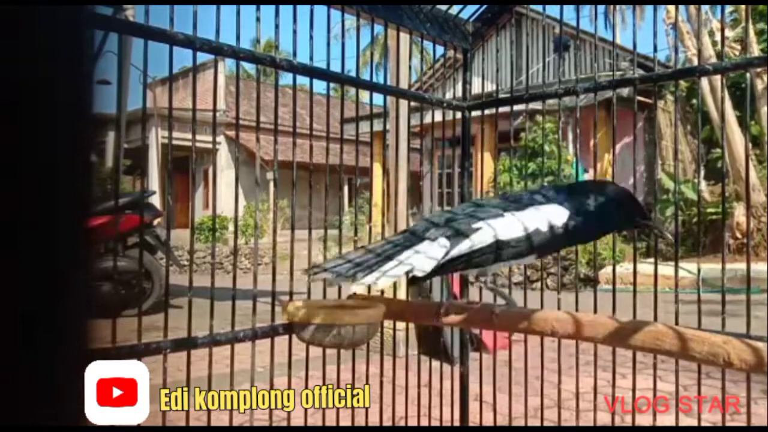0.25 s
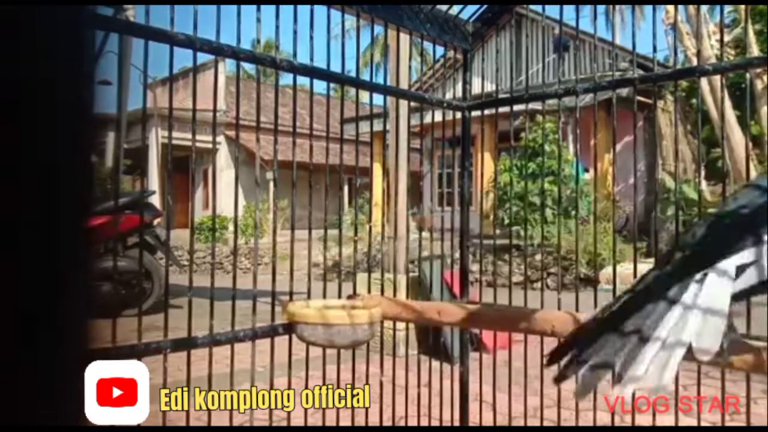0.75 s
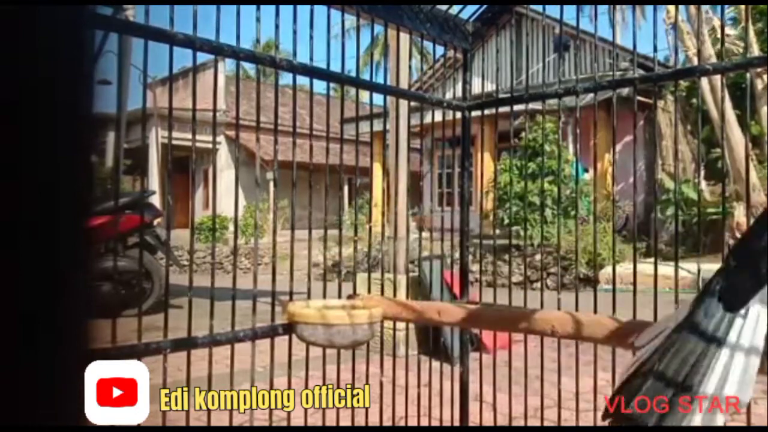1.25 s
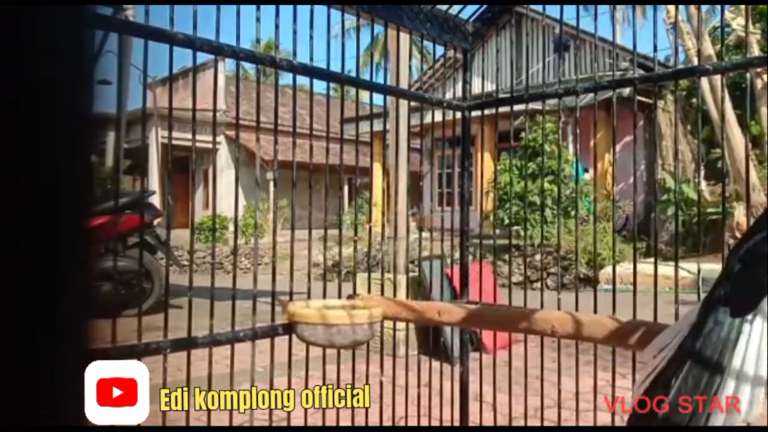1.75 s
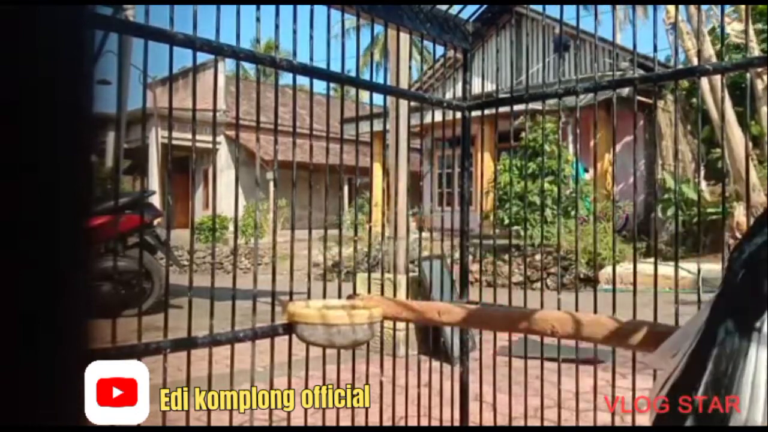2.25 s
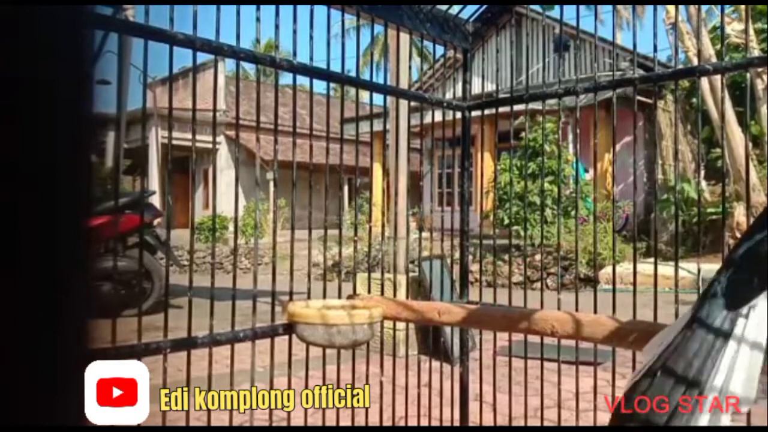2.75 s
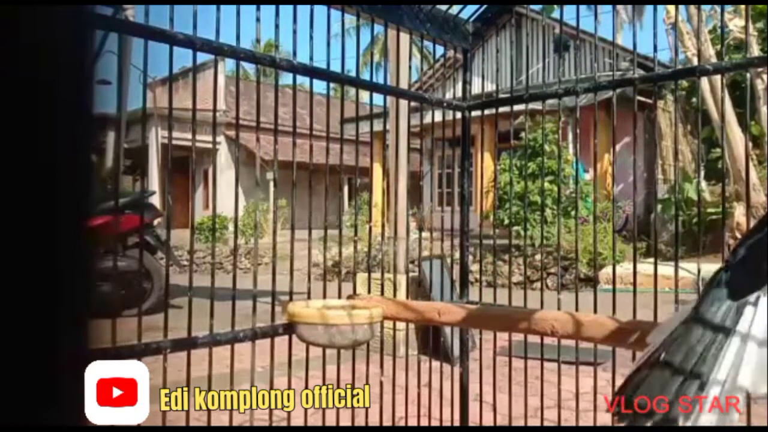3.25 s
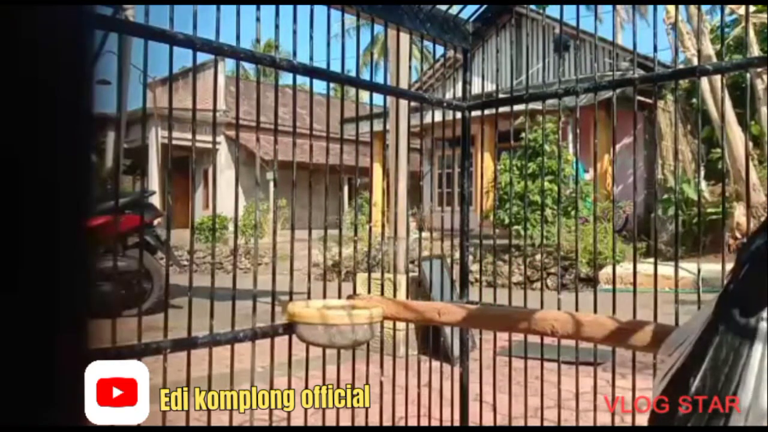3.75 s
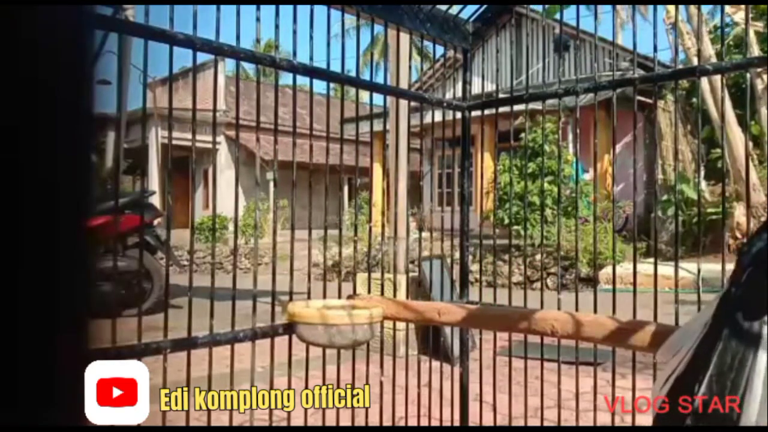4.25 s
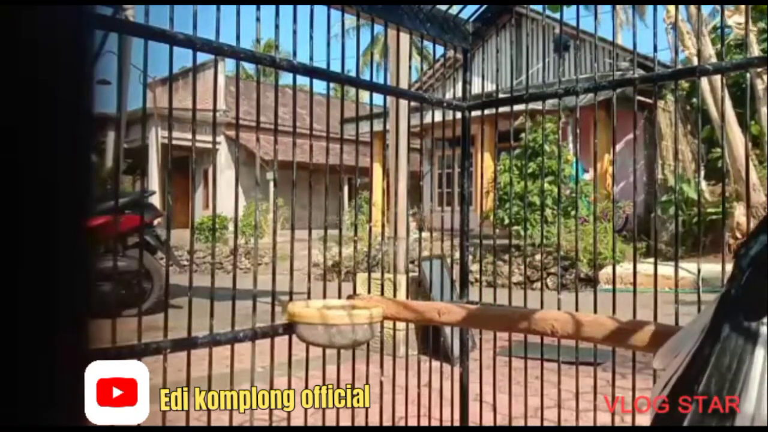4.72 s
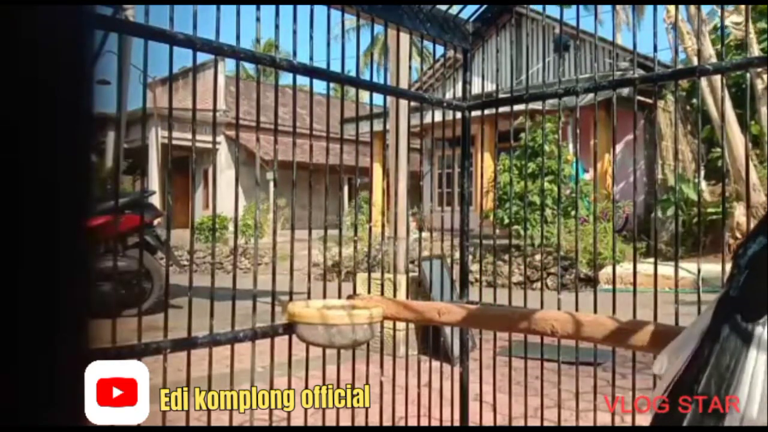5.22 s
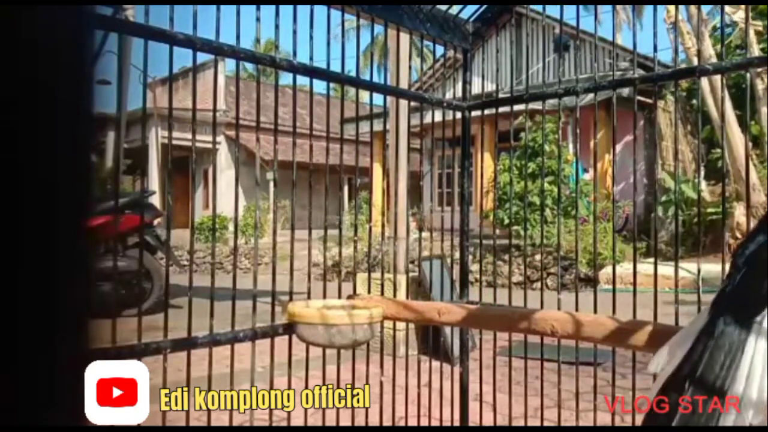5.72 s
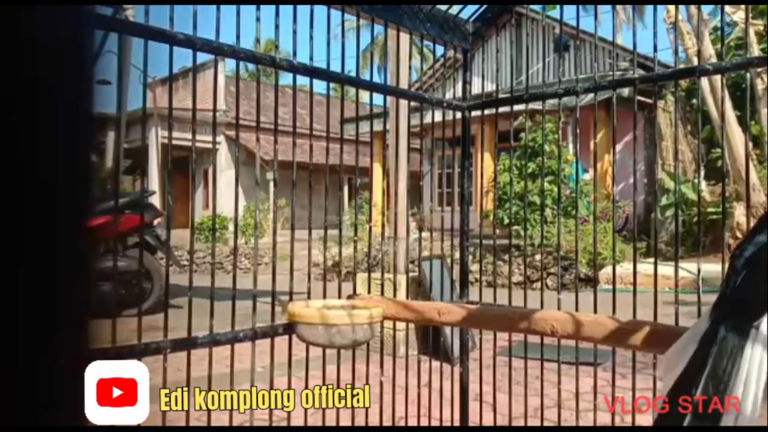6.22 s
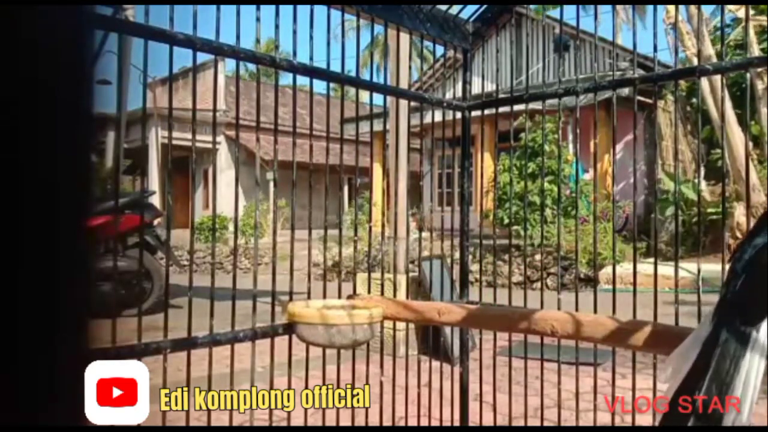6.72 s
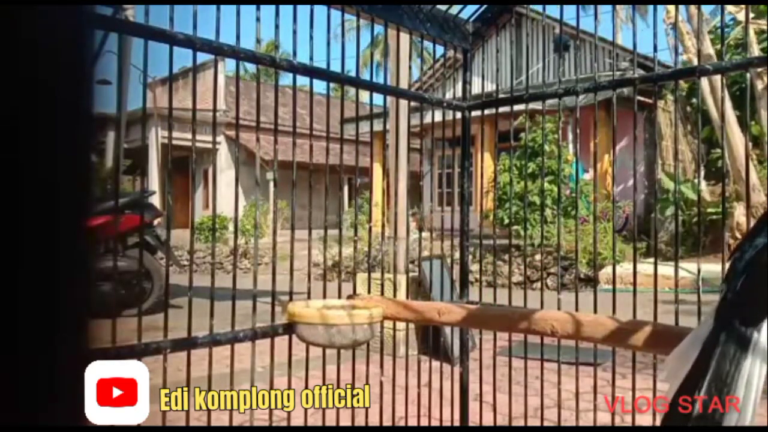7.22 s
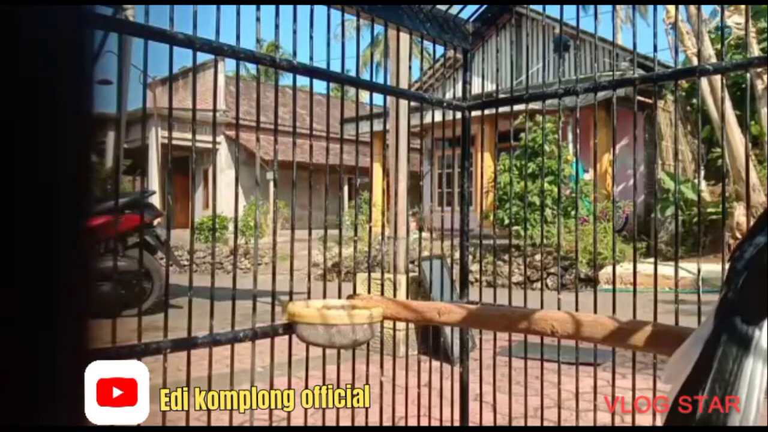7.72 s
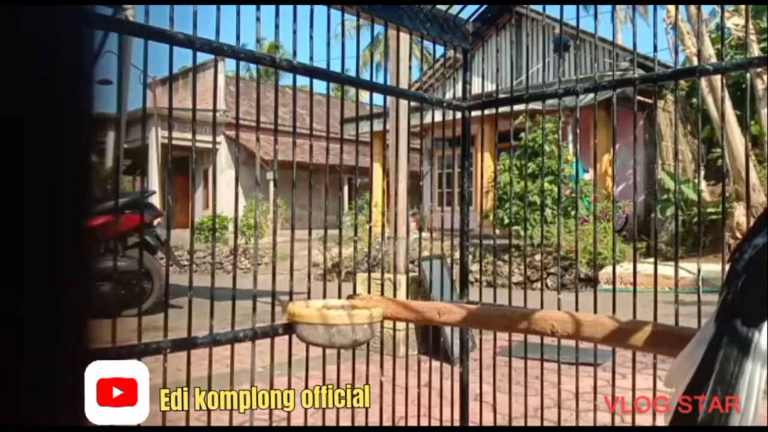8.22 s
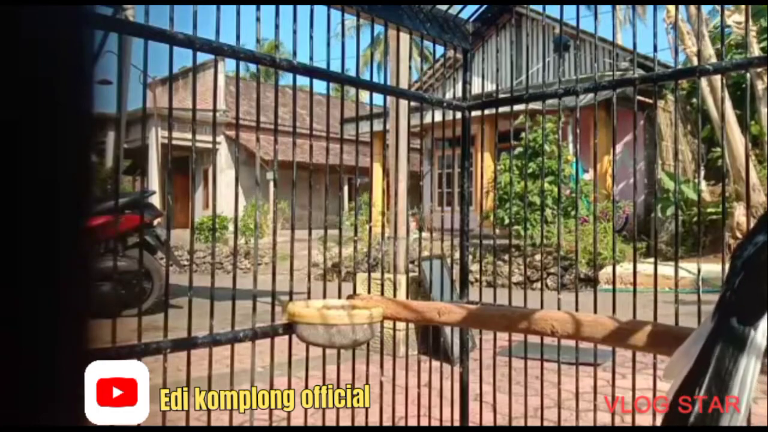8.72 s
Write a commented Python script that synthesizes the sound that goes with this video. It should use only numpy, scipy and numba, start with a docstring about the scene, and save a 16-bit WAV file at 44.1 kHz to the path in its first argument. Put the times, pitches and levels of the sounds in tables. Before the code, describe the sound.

Close, loud songbird whistles, chatters harshly and slides through falling notes in a yard, with one sharp cage click and faraway birds.

```python
"""A caged songbird sings close to a phone in a yard: whistles, rasping chatter, slides and swoops.
Its syrinx membranes make a gliding tone that the throat shapes; a second voice adds the rasp.
A claw strikes the cage, other birds answer from further off, walls echo, wind thumps on the
microphone port. The phone's gain control ducks the background under every loud note."""
import sys
import numpy as np
from scipy import signal
from scipy.fft import rfft, irfft, next_fast_len
from scipy.io import wavfile
from scipy.ndimage import uniform_filter1d
from numba import njit

SR = 44100
rng = np.random.default_rng(int(sys.argv[2]) if len(sys.argv) > 2 else 0)


def generate_wav(sig):
    """Save sig (samples, or channels by samples) to the path in sys.argv[1] as 16-bit PCM at SR."""
    pcm = np.round(np.clip(np.atleast_2d(sig).T, -1, 1) * 32767).astype(np.int16)
    wavfile.write(sys.argv[1], SR, pcm)


N = 395577
TIME = np.arange(N) / SR
BAND_LIMIT_HZ = 16800

# throat, beak and microphone together: (frequency [Hz], gain [dB])
THROAT_RESPONSE = [(600, -38.5), (1300, -10.5), (1900, -15), (2800, 2.5), (5500, 0), (6400, 0.5), (7300, 0),
                   (9500, -11.5), (12000, -16.5), (13500, -72), (15000, 5.5), (15700, -6.5), (16300, -54.5)]
# chatter: (start [s], length factor, pitch factor, level [dB], scoop depth [Hz])
CHATTER_NOTES = [(3.192, 1.034, 1.005, -5, 300.8), (3.3545, 0.91, 0.99, -4.5, 1002),
                 (3.5115, .99, 1.01, -2.5, 400), (3.679, 1, 0.99, -2, 27.73), (3.842, 1.023, 1, -5.5, 29.3),
                 (4.017, 0.984, 1.002, -4.5, 26.94), (4.2, 0.97, 1.011, -3, 30.3),
                 (4.3795, 1.054, 1.01, -2.3, 32.43), (4.567, 1.036, 1.017, -3.5, 30.2),
                 (4.771, 1.06, 1.005, -4.5, 29.34)]
# low harsh calls: (start [s], length factor, pitch factor, level [dB])
CHUCK_NOTES = [(0.148, 0.98, 0.928, -5), (2.614, 1, 1.034, -1), (2.926, 1, 1.1, 0.5)]
# steep falls that flatten out: (start [s], length factor, pitch factor, level [dB])
PLUNGE_NOTES = [(5.613, 0.95, .999, 0.055), (6.958, 1.01, 1.005, 0.11)]
# falling whistles: (start [s], length [s], first pitch [Hz], fall [Hz/s], floor [Hz], level [dB])
SLIDE_NOTES = [(5.156, 0.13, 6310, 24930, 3500, -0.5), (5.298, 0.094, 6242, 26100, 3800, -1),
               (5.457, 0.097, 5740, 18770, 3700, -1.5), (6.439, 0.15, 6060, 20050, 3620, -0.9),
               (6.599, 0.1026, 6116, 17800, 3700, -3.5), (6.775, 0.12, 5710, 17500, 3730, -1.5)]
# swoops that end climbing: (top time [s], top pitch [Hz], top level [dB], dive [s], bottom lift [dB],
# ending length factor, ending pitch factor, overtone lift [dB], flick level [dB])
CLIMBING_SWOOPS = [(7.2589, 5702, -7.5, 0.071, 4, 0.9, 1.0296, -5, -23),
                   (7.545, 4730, 3, 0.066, -1.5, 0.96, 1.02, -13.5, -7),
                   (7.855, 4410, -9, .056, -2, 1.033, .98, -14.5, -45),
                   (8.159, 4694, -11, 0.066, -5.5, 1.043, 0.98, -8, -13)]
# swoops that level off: same columns
LEVELLING_SWOOPS = [(8.487, 5025, 3.3, 0.066, 0.16, 1.001, 0.99, -9.5, -14.5),
                    (8.795, 5710, 15, 0.063, 5, 1.32, 0.924, -0.5, -6)]


def amp(db):
    """Gain of a level in dB."""
    return 10 ** (np.asarray(db) / 20)


def unit(x):
    """x at rms 1."""
    return x / np.sqrt(np.mean(x ** 2) + 1e-20)


def along(points, hz):
    """Interpolate (frequency [Hz], value) points on a log axis."""
    f, v = np.transpose(points)
    return np.interp(np.log(hz + 1), np.log(f + 1), v)


def wobble(rate_hz, size=N):
    """Piecewise linear random curve, rate_hz knots a second."""
    knots = rng.standard_normal(int(size * rate_hz / SR) + 2)
    return np.interp(np.arange(size) * rate_hz / SR, np.arange(len(knots)), knots)


def filtered(x, response):
    """Apply a gain given as a function of frequency."""
    m = next_fast_len(len(x) + 8192)
    return irfft(rfft(x, m) * response(np.fft.rfftfreq(m, 1 / SR)), m)[:len(x)]


def shaped(x, curve):
    """Filter by (frequency [Hz], gain [dB]) points."""
    return filtered(x, lambda f: amp(along(curve, f)))


def span(start_s, length_s, edge_s):
    """Gate with linear edges."""
    return np.clip(np.minimum(TIME - start_s, start_s + length_s - TIME) / edge_s, 0, 1)


def yard():
    """Faint, patchy hubbub of far birds and leaves, with one grainy rustle."""
    spectrum = [(300, -6), (700, -11.5), (1100, -15), (1260, 3), (1450, -21), (2300, -3), (4000, -7.5),
                (7200, -3.5), (8500, -20.5), (16000, -56.5)]  # hubbub: (frequency [Hz], relative density [dB])
    bins = signal.stft(rng.standard_normal(N + 512), nperseg=512)[2]
    patches = uniform_filter1d(uniform_filter1d(rng.standard_normal(bins.shape), 6, 0), 12, 1)
    hiss = signal.istft(bins * amp(5.2 * unit(patches)), nperseg=512)[1][:N]
    rustle_db = (9.1 + 5 * wobble(250)) * span(1.6887, 0.212, 0.062)
    return amp(-50.5 + rustle_db) * unit(shaped(hiss, spectrum))


def wind():
    """Eddies break on the port in short low lumps, brighter as the wind grows."""
    strength = [(0, -41), (.38, -32), (.9, -47), (1.85, -32), (2.25, -27), (2.6, -40), (2.9, -22),
                (3.3, -40.5), (4, -29.5), (4.6, -42.5), (5, -34), (5.4, -54.5), (5.9, -35), (6.5, -45),
                (7.2, -35.5), (7.55, -17.5), (8.02, -27.5), (8.97, -34.5)]  # buffeting: (time [s], level [dB])
    rumble_spectrum = [(20, -33.5), (45, -11), (80, 5.5), (130, -1), (220, -23), (400, -39.5), (700, -71),
                       (1500, -120)]  # its low body: (frequency [Hz], relative density [dB])
    flap_spectrum = [(90, -23.5), (160, 2.5), (300, -21), (500, -42), (1000, -110)]  # its upper edge: (frequency [Hz], relative density [dB])
    lumps = amp(4.73 * wobble(11) + 3.38 * wobble(25))
    rumble = unit(shaped(lumps * rng.standard_normal(N), rumble_spectrum))
    flap = unit(shaped(lumps * rng.standard_normal(N), flap_spectrum))
    gust_db = 17 * np.exp(-((TIME - 8.133) / 0.02) ** 2)
    level_db = np.interp(TIME, *np.transpose(strength)) + gust_db
    flap_db = -18 + 0.75 * (level_db - level_db.mean())
    return amp(level_db) * (rumble + amp(flap_db) * flap)


def walls(x, far_db=-14.5, far_t60_s=0.59, scatter=0.05):
    """Diffuse echo plus a weaker, longer far tail; moving leaves smear a share in pitch."""
    decay = [(1000, 0.3), (3500, 0.28), (8000, 0.18), (12000, 0.23)]  # wall echo: (frequency [Hz], t60 [s])
    hz, t, bins = signal.stft(rng.standard_normal(SR), SR, nperseg=256)
    envelope = amp(-60 * t / along(decay, hz)[:, None]) + amp(far_db - 60 * t / far_t60_s)
    tail = signal.istft(bins * envelope, SR, nperseg=256)[1]
    smeared = x * (np.sqrt(1 - scatter) + np.sqrt(scatter) * unit(wobble(900)))
    return signal.fftconvolve(np.pad(smeared, (300, 0)), tail / np.linalg.norm(tail))[:N]


def neighbours():
    """Distant birds: hoarse glides, the lower ones with a weak octave."""
    # calls: (start [s], length [s], first pitch [Hz], last pitch [Hz], level [dB], hoarseness [Hz])
    calls = [(0.078, 0.03, 3180, 2353, -39.5, 40), (0.108, 0.054, 2503, 2040, -31, 49.68),
             (0.708, 0.216, 3620, 3780, -45.5, 93), (0.978, 0.17, 3540, 6050, -47, 916.7),
             (1.68, 0.0207, 5500, 4800, -36, 129.6), (1.707, 0.042, 5320, 6260, -34, 111.1),
             (1.798, 0.043, 4170, 4780, -39.5, 129.6), (0.949, 0.072, 1940, 1875, -48.5, 62.7),
             (1.841, 0.025, 5150, 5760, -33.5, 216), (2.319, 0.041, 5680, 6340, -32.5, 248.4),
             (2.557, 0.085, 2544, 2582, -44, 275.6), (2.081, 0.15, 2370, 2330, -63.5, 29.6),
             (5.305, 0.025, 3120, 2720, -26.5, 98), (5.449, 0.083, 2310, 2450, -41, 185.2),
             (6.774, 0.055, 2130, 1786, -45.5, 99.5), (7.632, 0.19, 4920, 4550, -40, 138),
             (7.113, 0.14, 1907, 1653, -50, 162), (7.122, 0.096, 723, 794, -55.5, 37.04),
             (8.073, 0.027, 2340, 3228, -40, 30), (8.097, 0.033, 3260, 2300, -32, 32.04),
             (8.179, 0.051, 3800, 3640, -23.5, 48.06), (8.648, 0.1, 3580, 3341, -26.5, 55.6),
             (8.668, 0.098, 2325, 2258, -35.5, 24), (8.637, 0.11, 4740, 4440, -33.5, 57.5),
             (8.78, .19, 3183, 3045, -29.5, 37)]
    trill = [(.245, 2185, -41.5), (.352, 2160, -38.5), (0.436, 1926, -38.5), (.522, 2530, -41.5),
             (0.551, 1893, -40.5), (0.611, 2680, -40), (.64, 2170, -41), (0.699, 2530, -39.5),
             (.733, 1970, -44), (.808, 2250, -38.5)]  # row of dropping notes: (start [s], landing pitch [Hz], level [dB])
    notes = [(*row, 1) for row in calls] + [(s, 0.04, hz * 1.18, hz, db, 70, 3) for s, hz, db in trill]
    out = np.zeros(N)
    for start_s, length_s, first_hz, last_hz, db, hoarse_hz, bend in notes:
        n = round(length_s * SR)
        glide_hz = last_hz + (first_hz - last_hz) * np.linspace(1, 0, n) ** bend
        phase = 2 * np.pi * np.cumsum(glide_hz + hoarse_hz * wobble(600, n)) / SR
        swell = np.sin(np.pi * np.arange(n) / n) ** 0.28 * amp(db + 5 * wobble(112, n))
        octave = 0.052 * (first_hz < 4000) * np.sin(2 * phase)
        out[round(start_s * SR):][:n] += swell * (np.sin(phase) + octave)
    return out


def cage(crack_t60_s=0.0028, rattle_t60_s=0.3):
    """A claw strikes the cage: sharp cracks, each with a short rattle of the bars."""
    strikes = [(2.361, -6.5), (2.377, -24)]  # claw strikes: (time [s], level [dB])
    response = [(700, -14), (1500, -3), (7000, 2), (10000, -14), (15200, -22.5)]  # ([Hz], [dB])
    out, t = np.zeros(N), np.arange(SR // 4) / SR
    envelope = amp(-60 * t / crack_t60_s) + amp(-25 - 60 * t / rattle_t60_s)
    for start_s, db in strikes:
        out[round(start_s * SR):][:len(t)] += amp(db) * envelope * rng.standard_normal(len(t))
    return shaped(out, response)


def repeated(shape, repeats, lift_db, thinning_db_per_s=0):
    """Stretched, transposed copies of one note shape; the overtones may thin out along it."""
    t, hz, db = np.transpose(shape)
    return [np.transpose([s + t * longer, hz * higher, db + gain_db, lift_db - thinning_db_per_s * t])
            for s, longer, higher, gain_db, *_ in repeats]


def scooped(note, depth_hz, scoop_hz_per_s=200000, scoop_s=0.005, sag_s=0.009):
    """A note entered from below and left downward, with a random overtone lift."""
    rows = np.vstack([note[0] - [depth_hz / scoop_hz_per_s, 0, 0, 0], note])
    t = rows[:, 0]
    rows[:, 1] -= depth_hz * np.exp(-(t - t[0]) / scoop_s)
    rows[:, 1] -= min(depth_hz, 427.5) * np.exp((t - t[-1]) / sag_s)
    rows[:, 3] += rng.normal(0, 2.5)
    return rows


def whistles(lift_db, thinning_db_per_s):
    """Level whistles: scoop, hold, final upward flick."""
    # whistles: (start [s], hold end [s], pitch factor, level [dB], creep before flick [Hz], scoop share)
    repeats = [(.831, .934, .99, -4, 90, 1), (1.213, 1.343, .997, -2.5, 130, 1),
               (1.537, 1.658, 1.003, -2.5, 70, .8), (1.898, 2.043, .999, -2, 5, .45)]
    onset = [(0, 2893, -22.5), (.005, 3122, -9.5), (.011, 3376, 0), (.019, 3520, 1.5), (.03, 3517, 8)]  # scoop: (time after start [s], pitch [Hz], level [dB])
    flick = [(-.03, 3537, 8), (-.008, 3537, 9.5), (0, 3613, 2.5), (.004, 5000, -7.5), (.008, 5656, -7)]  # flick: (time after hold end [s], pitch [Hz], level [dB])
    notes, held_hz = [], onset[-1][1]
    for start_s, end_s, higher, gain_db, creep_hz, scoop in repeats:
        rows = [(start_s + t, held_hz + scoop * (hz - held_hz), db) for t, hz, db in onset]
        rows += [(end_s + t, hz + creep_hz * (-0.012 < t < 0.002), db) for t, hz, db in flick]
        notes.append(np.array([(t, hz * higher, db + gain_db, lift_db - thinning_db_per_s * (t - start_s))
                               for t, hz, db in rows]))
    return notes


def slides(lift_db, break_hz=4750, landing_hz=260, attack_s=0.005, release_s=0.011, tie_s=0.03):
    """Falls that slip at the voice break and ease out; close ones are tied by an upward flick."""
    break_levels = [(3500, 3.5), (3900, -1.5), (4500, 9.5), (4750, 1), (5300, 8.5), (6000, 2.5)]  # voice breaking on the way down: (pitch [Hz], level [dB])
    notes, end_s, u = [], -1, np.linspace(0, 1, 25)
    for start_s, length_s, first_hz, fall_hz_per_s, floor_hz, db in SLIDE_NOTES:
        straight_hz = first_hz - fall_hz_per_s * length_s * u
        slipped_hz = straight_hz - 324.7 / (1 + np.exp((straight_hz - break_hz) / 180))
        hz = floor_hz + landing_hz * np.logaddexp(0, (slipped_hz - floor_hz) / landing_hz)
        body = np.transpose([start_s + length_s * u, hz, db + along(break_levels, hz)])
        tail = [(start_s + length_s + release_s, 0.95 * hz[-1], -25)]
        if start_s - end_s < tie_s:
            notes[-1] = np.vstack([notes[-1][:-1], [(start_s - attack_s, 0.74 * first_hz, 1)], body, tail])
        else:
            notes.append(np.vstack([[(start_s - attack_s, 1.03 * first_hz, -30)], body, tail]))
        end_s = start_s + length_s
    return [np.c_[note, np.full(len(note), lift_db)] for note in notes]


def swoops(rows, ending, flick_hz=2710, flick_s=0.0092, rise_s=0.0034):
    """Upward flick, dive and ending joined into one note."""
    dive = [(0.071, 3498, 1.5), (0.159, 2678, -1), (0.442, 2300, -9.5), (.6, 1920, -17.5),
            (0.999, 1675, -25.5)]  # descent: (share of the dive, pitch [Hz], level [dB])
    notes = []
    for top_s, top_hz, top_db, dive_s, low_db, longer, higher, lift_db, flick_db in rows:
        near_top_hz = top_hz - (top_hz - flick_hz) * (rise_s / flick_s) ** 2
        note = [(top_s - flick_s, flick_hz, flick_db - 18), (top_s - rise_s, near_top_hz, flick_db),
                (top_s, top_hz, top_db)]
        note += [(top_s + u * dive_s, hz, db + low_db * u) for u, hz, db in dive]
        note += [(top_s + dive_s + t * longer, hz * higher, db + low_db * max(0, 1 - t / 0.043))
                 for t, hz, db in ending]
        notes.append(np.c_[note, np.full(len(note), lift_db)])
    return notes


def song_notes():
    """All notes in order, each as rows of (time [s], pitch [Hz], level [dB], overtone lift [dB])."""
    # note shapes: (time after start [s], pitch [Hz], level [dB])
    chatter_shape = [(0.003, 2428, -22.5), (0.0052, 2515, -5.5), (0.0131, 2504, 3), (0.0572, 2295, -7),
                     (0.0762, 2194, -5), (0.0781, 2092, -0.5), (0.1035, 1990, -10.5), (0.1095, 1897, -20),
                     (0.114, 1880, -27)]
    chuck_shape = [(.004, 2249, -24.5), (.022, 1986, -5.5), (.042, 1645, -5), (.066, 1969, -9.5),
                   (.072, 1900, -6.5), (.077, 1799, -31)]
    plunge_shape = [(0, 5855, -10), (.0075, 5480, -4.5), (.014, 3978, 5), (.02, 3128, -2.5),
                    (.039, 2380, -8.5), (.072, 1924, -2), (.123, 1720, -4), (.138, 1552, -15),
                    (.146, 1444, -25)]
    arch_shape = [(0, 1517, -29.5), (.012, 2234, -23.5), (.034, 3547, 8.5), (.046, 3295, -2),
                  (.06, 2700, -5), (.066, 2675, -20)]  # up and over
    hook_shape = [(.001, 4650, -31), (.004, 4570, 4.5), (.021, 2840, 1.5), (.032, 2640, -3.5),
                  (.044, 2630, -5), (.05, 2670, -46)]  # short fall
    blip_shape = [(.002, 1740, -12), (.012, 2342, -1), (.027, 1338, -24)]  # small arch after a hook
    # their repeats: (start [s], length factor, pitch factor, level [dB])
    arches = [(5.037, .98, .95, 0.12), (6.319, 1.001, 1.001, .1)]
    hooks = [(5.912, .99, .995, 0.84), (6.114, 1.03, 1.005, -1.9)]
    blips = [(5.966, 0.9, 1.001, -2.5), (6.169, 1.4, .86, -8.5)]
    # swoop endings: (time after the bottom [s], pitch [Hz], level [dB])
    climb = [(0.014, 1872, -23.5), (0.027, 2770, -7.5), (.045, 2978, -0.5), (.072, 3246, 0.5),
             (.098, 3920, 4.5), (0.108, 3965, 8.5), (.13, 3578, -11)]
    level_off = [(0.016, 1880, -17), (0.032, 2721, -10.5), (0.051, 2970, -0.5), (.1, 2722, 1),
                 (.133, 2670, -3), (.142, 2587, -11)]
    chatter = repeated(chatter_shape, CHATTER_NOTES, lift_db=-3.5, thinning_db_per_s=157.5)
    notes = [scooped(note, row[-1]) for note, row in zip(chatter, CHATTER_NOTES)]
    notes += whistles(lift_db=-4.5, thinning_db_per_s=41)
    notes += repeated(chuck_shape, CHUCK_NOTES, lift_db=-9.5, thinning_db_per_s=111)
    notes += repeated(arch_shape, arches, lift_db=-5.5)
    notes += repeated(plunge_shape, PLUNGE_NOTES, lift_db=10.5)
    notes += repeated(hook_shape, hooks, lift_db=2) + repeated(blip_shape, blips, lift_db=-10.5)
    notes += slides(lift_db=-14.5)
    notes += swoops(CLIMBING_SWOOPS, climb) + swoops(LEVELLING_SWOOPS, level_off)
    return sorted(notes, key=lambda note: note[0][0])


def rasping(phase, attack_s=0.012, release_s=0.011):
    """Both syrinx halves mix into sum and difference tones and noise; returns (rasp, share drowned)."""
    # second voice: (delay [s], length [s], pitch [Hz], fall share, level re note [dB], share drowned)
    chuck_rasp = (0.001, .042, 3300, .2, 2.7, .85)
    chatter_rasp = (.048, .053, 4100, .42, -0.5, .5)
    plunge_rasp = (.013, .035, 4900, .2, -10, .2)
    kinds = (CHUCK_NOTES, chuck_rasp), (CHATTER_NOTES, chatter_rasp), (PLUNGE_NOTES, plunge_rasp)
    events = [(row[0] + delay_s, *rest) for rows, (delay_s, *rest) in kinds for row in rows]

    def response(hz):
        return amp(along(THROAT_RESPONSE, hz)) / (1 + (hz / 9230) ** 2) / (1 + (1500 / (hz + 1)) ** 4)

    rasp, drowned = np.zeros(N), np.zeros(N)
    for start_s, length_s, top_hz, fall, rasp_db, share in events:
        cut = slice(round(start_s * SR), round((start_s + length_s) * SR))
        t = TIME[cut] - start_s
        warble = np.sin(2 * np.pi * rng.normal(86, 5.5) * t + rng.normal(-1.2, 0.66))
        contour = 1 - fall * t / length_s - 0.18 * np.exp(-t / 0.008)
        second_hz = top_hz * (contour + 0.068 * warble + 0.04 * wobble(450, len(t)))
        second_phase = 2 * np.pi * np.cumsum(second_hz) / SR
        pulses = np.exp(0.7 * np.cos(second_phase) + 0.6 * np.cos(phase[cut]))
        noise = 0.6 * unit(np.sqrt(pulses)) * rng.standard_normal(len(t))
        mixed = unit(pulses - pulses.mean()) + 0.25 * np.cos(second_phase + phase[cut]) + noise
        gate = np.clip(np.minimum(t / attack_s, (length_s - t) / release_s), 0, 1)
        level_db = rasp_db + 3.5 * warble - 12 * (t / length_s - 0.5) + rng.normal(0, 1.5)
        rasp[cut] = amp(level_db) * gate * unit(filtered(mixed, response))
        drowned[cut] = gate * share
    return rasp, drowned


def undertones(phase, length_s=0.0153):
    """The membranes briefly skip every other beat: tones at 1/2 and 3/2 of the pitch."""
    skips = [4.385, 4.574, 4.778, 7.563, 7.624, 7.866, 7.935, 8.245, 8.58]  # skipping: (start [s])
    gate = sum(span(start_s, length_s, 0.0031) for start_s in skips)
    return gate * (amp(-23.5) * np.sin(phase / 2) + amp(-25) * np.sin(3 / 2 * phase))


def unsteadiness(swoop_tops):
    """Relative pitch deviations: (fast quaver and scratch, slower waver)."""
    quavers = [(5.249, 0.037, 129.2, 0.022), (6.517, 0.087, 137.7, 0.045)]  # pitch shakes: (start [s], length [s], rate [Hz], depth share)
    hoarse = [(.004, .045, .022), (.112, .035, .045)]  # scratch in plunges and chucks: (delay [s], length [s], depth share)
    quaver = sum(depth * span(s, length_s, 0.0027) * np.sin(2 * np.pi * hz * TIME + 1.2 * wobble(57))
                 for s, length_s, hz, depth in quavers)
    scratch = wobble(900) * sum(depth * span(row[0] + delay_s, length_s, 0.008)
                                for row in PLUNGE_NOTES + CHUCK_NOTES for delay_s, length_s, depth in hoarse)
    chattering = sum(span(row[0], 0.115, 0.008) for row in CHATTER_NOTES)
    waver = 0.018 * uniform_filter1d(wobble(130), 150) * chattering
    scratch += 0.035 * wobble(1100) * swoop_tops
    waver += 0.009 * uniform_filter1d(wobble(110), 130) * (TIME > SLIDE_NOTES[0][0])
    return quaver + scratch, waver


def harmonics(phase, pitch_hz, lift_db, slack, wander):
    """Nine throat-shaped partials at rms 1; low notes close the membranes harder and are richer."""
    k = np.arange(1, 10)[:, None]
    slope_db = along([(1500, -5.5), (2400, -7.5), (3500, -8), (5500, -14.5)], pitch_hz)
    flutter_db = 4.9 * np.array([wobble(90) for _ in k]) * wander
    overtone_db = slack * lift_db * 0.94 ** (k - 2) + 0.053 * np.minimum(lift_db, 0) * (k - 2) + flutter_db
    gains = amp(slope_db * (k - 1) + along(THROAT_RESPONSE, k * pitch_hz) + (k > 1) * overtone_db)
    gains *= k * pitch_hz < BAND_LIMIT_HZ
    return np.sqrt(2) * np.sum(gains * np.sin(k * phase), axis=0) / np.linalg.norm(gains, axis=0)


def songbird():
    """Syrinx membranes follow the notes: a gliding tone with rasp, undertones and breath."""
    notes = song_notes()
    times_s, hz, db, lift_db = np.concatenate(notes).T
    sounding = np.zeros(N)
    for note in notes:
        sounding[round(note[0][0] * SR):round(note[-1][0] * SR)] = 1
    swoop_tops = sum(span(row[0] - 0.004, 0.02, 0.006) for row in CLIMBING_SWOOPS + LEVELLING_SWOOPS)
    shake, waver = unsteadiness(swoop_tops)
    log_pitch = uniform_filter1d(np.interp(TIME, times_s, np.log(hz)), 200)  # muscles round off each turn
    glide_per_s = np.abs(uniform_filter1d(np.gradient(log_pitch), 900)) * SR
    moving = np.clip(glide_per_s / 2.5, 0, 1)  # 0 held, 1 fast glide
    waver_db = (0.6 + 2 * moving) * uniform_filter1d(wobble(190), 150)
    level = amp(np.interp(TIME, times_s, db) + waver_db) * uniform_filter1d(sounding, 120)
    slack = along([(2600, 1), (4500, 0.164)], np.exp(log_pitch))  # low notes: slack, unsteady membranes
    wander = np.maximum(moving, 0.45)
    jitter = 0.002 * wobble(300) + 0.016 * slack * wander * wobble(70)
    pitch_hz = np.exp(log_pitch) * (1 + shake + waver + jitter)
    phase = 2 * np.pi * np.cumsum(pitch_hz) / SR
    tone = harmonics(phase, pitch_hz, np.interp(TIME, times_s, lift_db), slack, wander)
    rasp, drowned = rasping(phase)
    breath = amp(-50.5 + 30 * swoop_tops) * unit(shaped(rng.standard_normal(N), THROAT_RESPONSE))
    return level * (1 + 6.4 * shake) * (tone * (1 - drowned) + rasp + undertones(phase) + breath)


def scene():
    """Mono mix: the singer nearly dry, the neighbours with more echo."""
    near, far = songbird() + cage(), neighbours()
    echo = walls(amp(-26) * near + amp(3.5) * far)
    return (near + amp(4) * far + echo + wind() + yard())[None]


@njit
def recovering(cut_db, step_db):
    """The gain cut rises at once and sinks by step_db a sample."""
    out = cut_db.copy()
    for i in range(1, len(out)):
        out[i] = max(out[i], out[i - 1] - step_db)
    return out


def record(dry):
    """Phone: 2:1 gain control above a threshold, soft clipping, band limit."""
    threshold_db, release_db_per_s, ceiling = -24.5, 260, 0.7
    level_db = 10 * np.log10(np.abs(uniform_filter1d(dry[0] ** 2, 130)) + 1e-12)
    cut_db = recovering(0.5 * np.maximum(level_db - threshold_db, 0), release_db_per_s / SR)
    ducked = dry[0] * amp(-uniform_filter1d(cut_db, 160))
    clipped = ducked / (1 + np.abs(ducked / ceiling) ** 6) ** (1 / 6)
    return filtered(clipped, lambda f: f < BAND_LIMIT_HZ)[None]


dry = scene()
out = record(dry)
generate_wav(out)
```